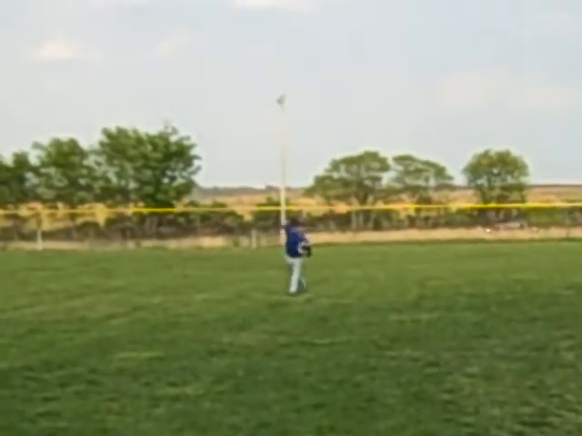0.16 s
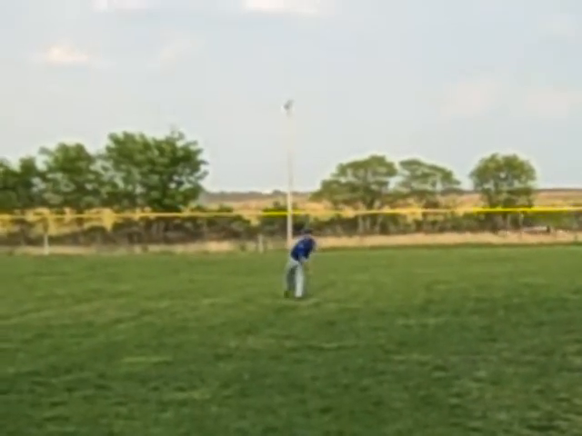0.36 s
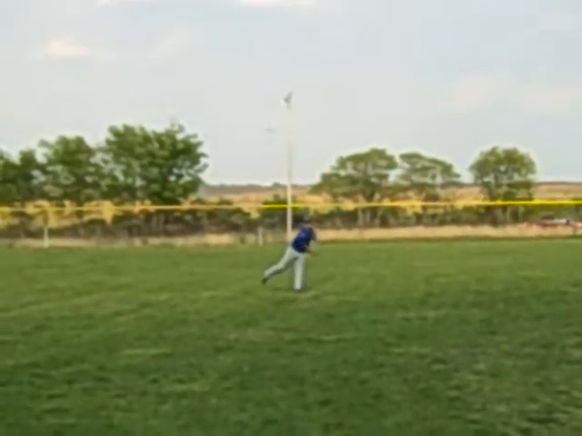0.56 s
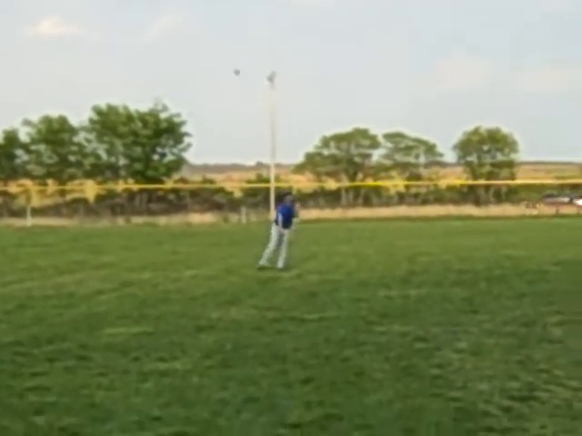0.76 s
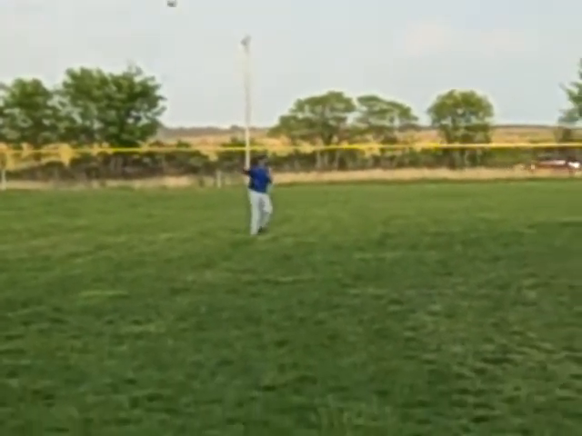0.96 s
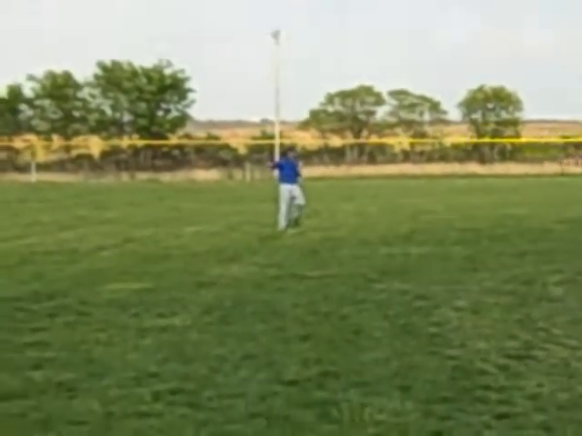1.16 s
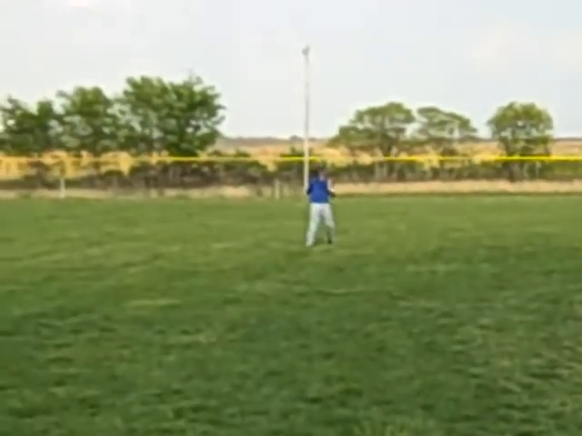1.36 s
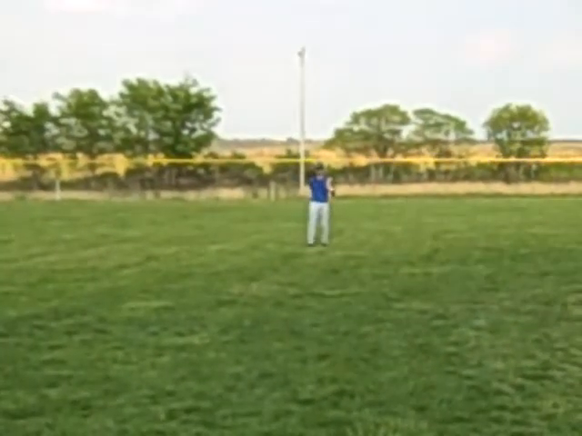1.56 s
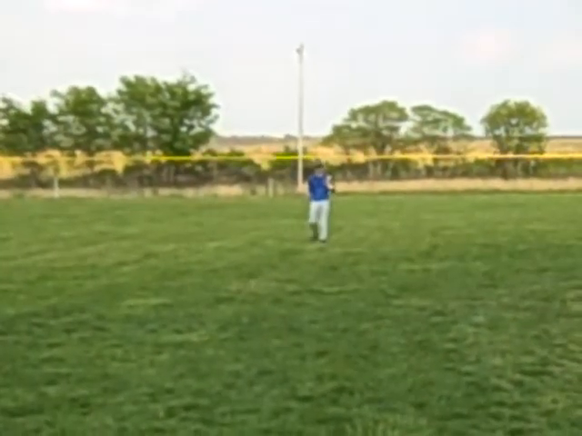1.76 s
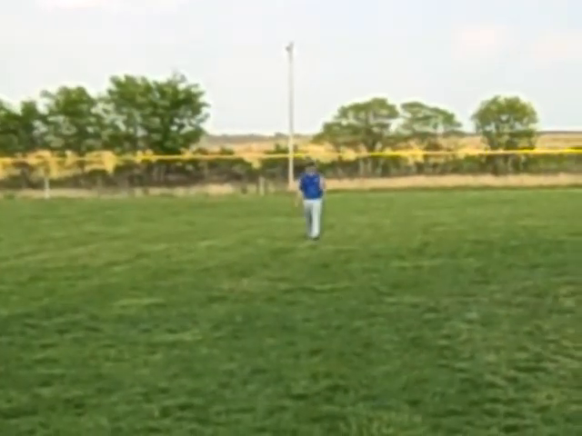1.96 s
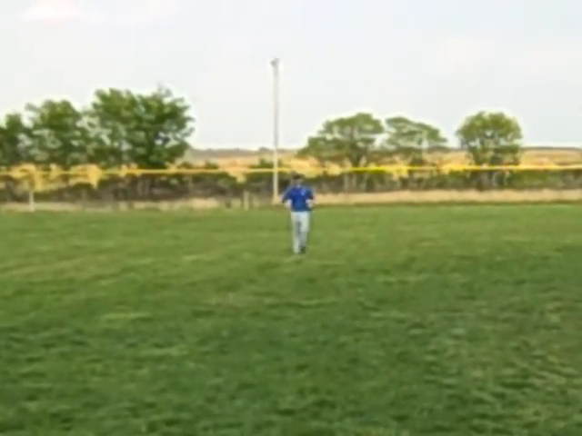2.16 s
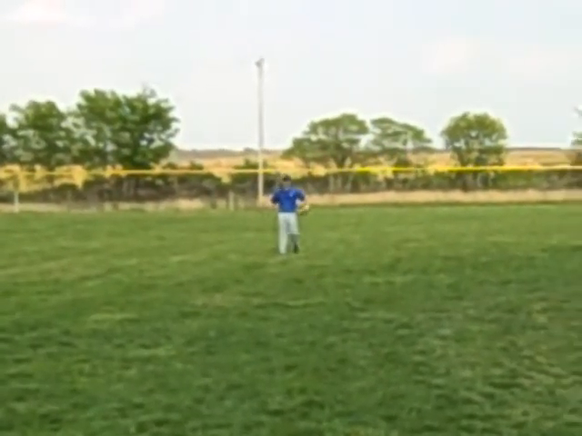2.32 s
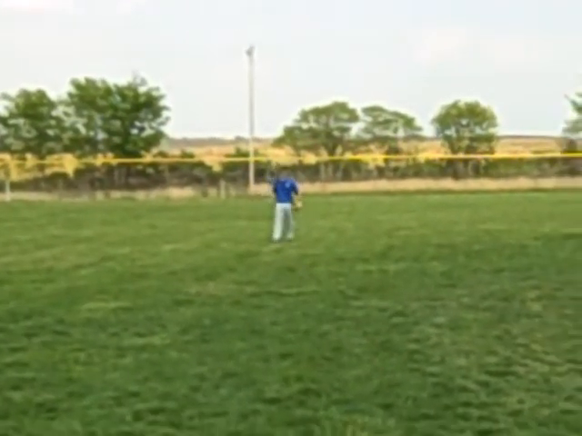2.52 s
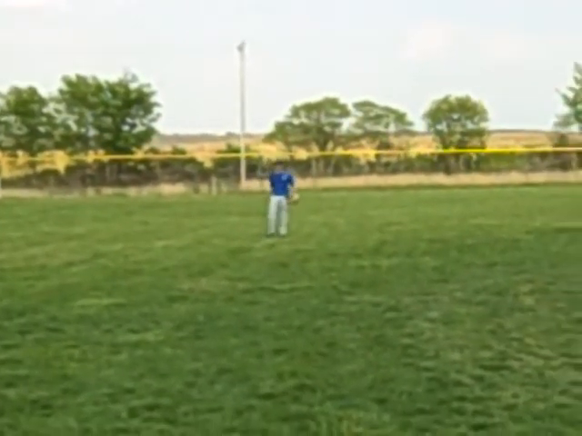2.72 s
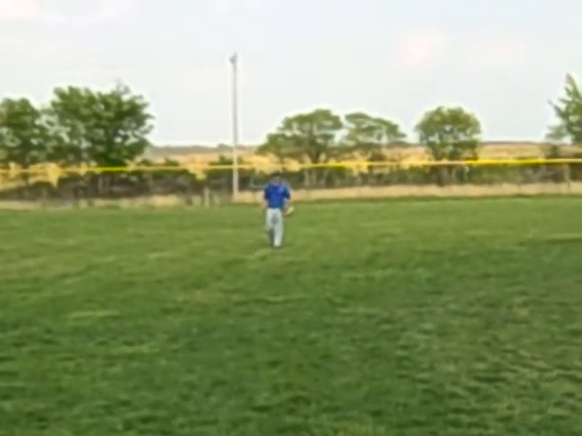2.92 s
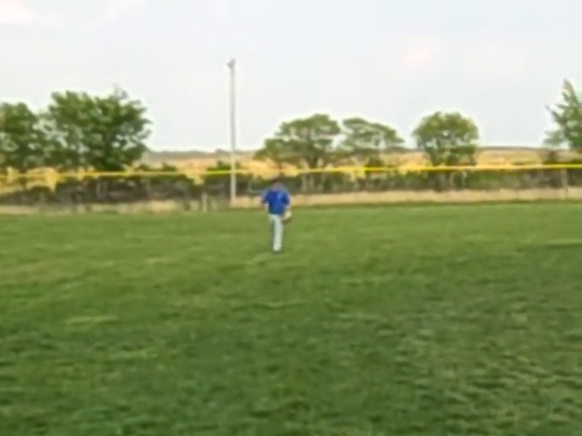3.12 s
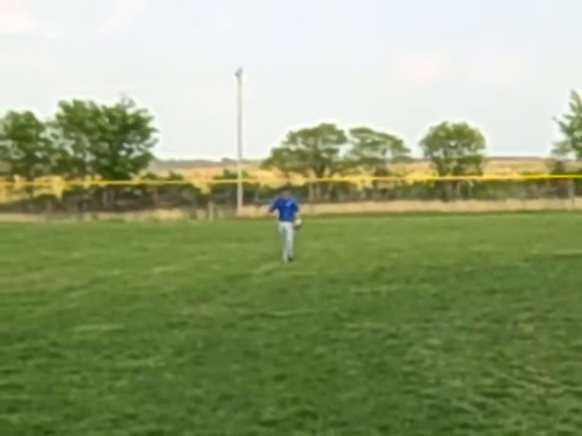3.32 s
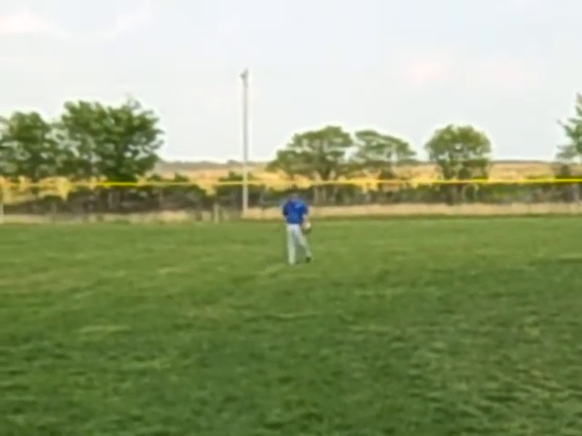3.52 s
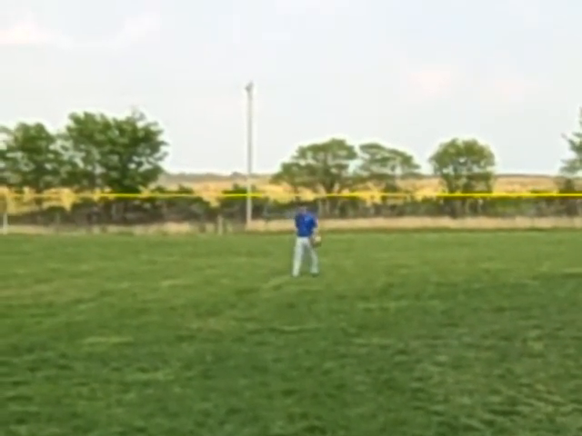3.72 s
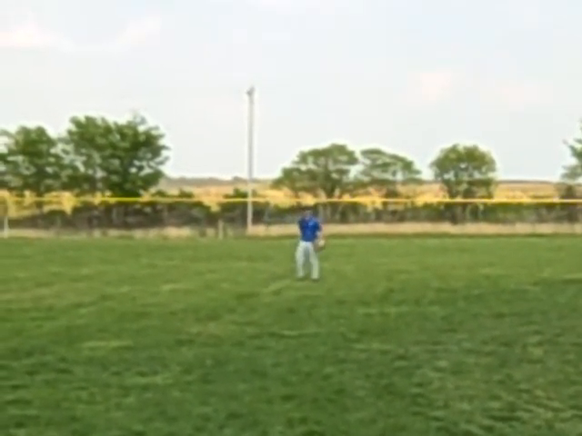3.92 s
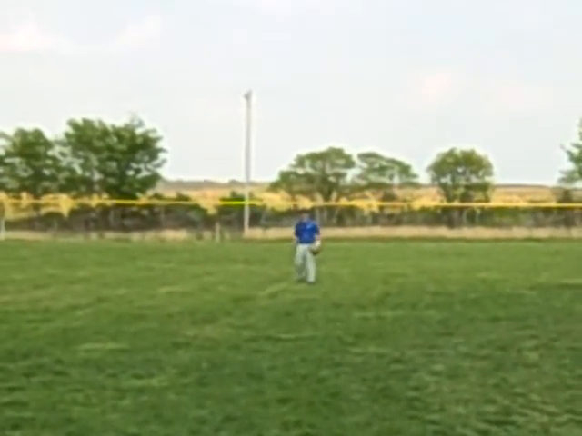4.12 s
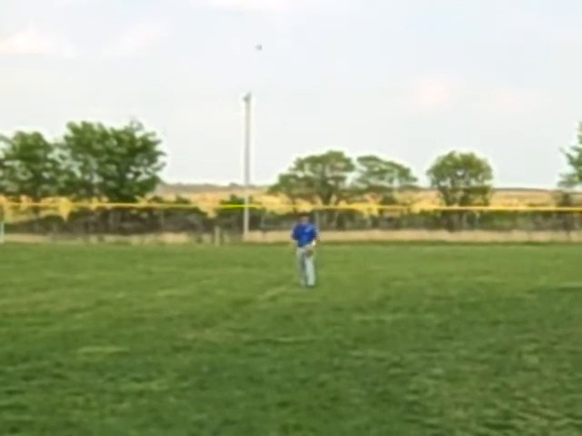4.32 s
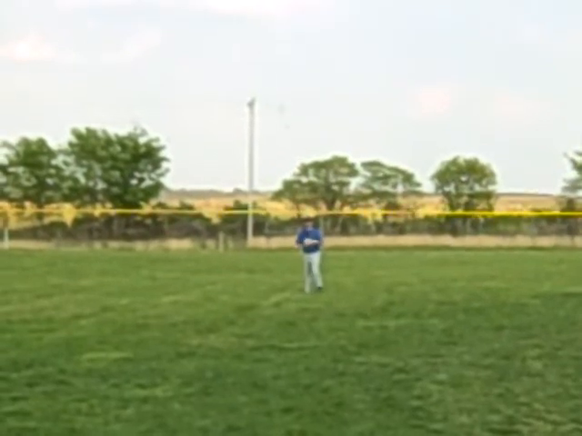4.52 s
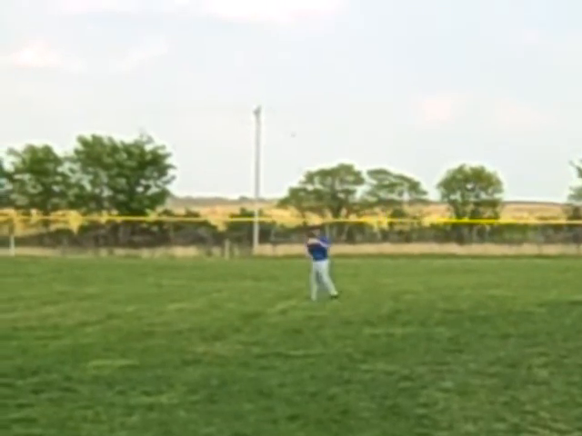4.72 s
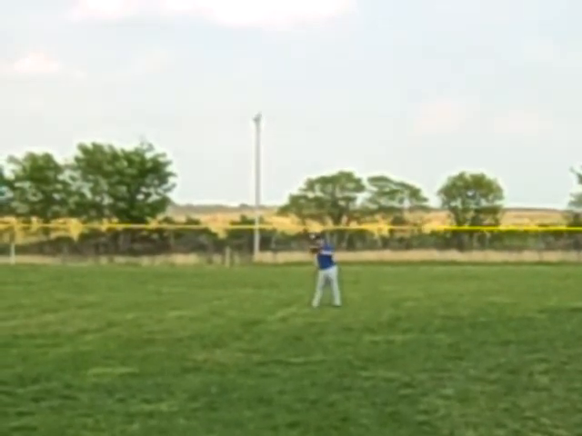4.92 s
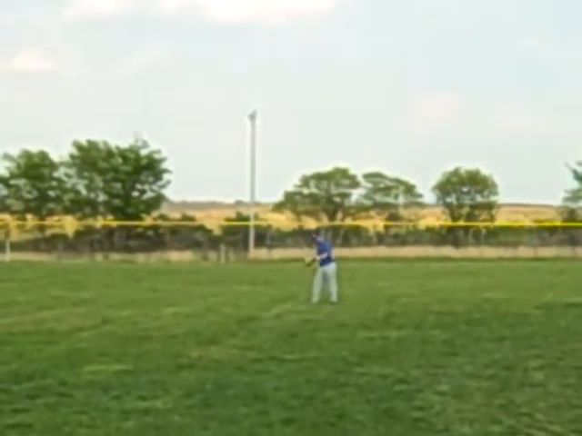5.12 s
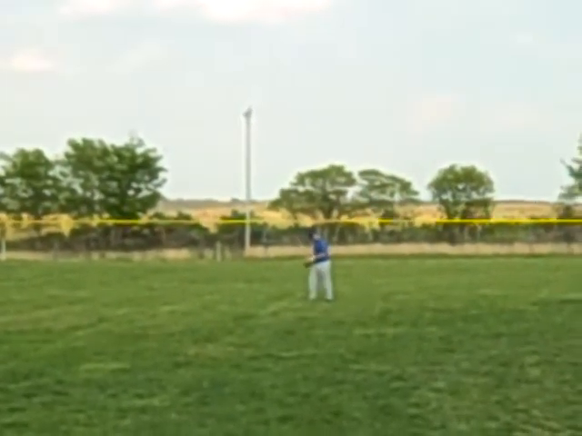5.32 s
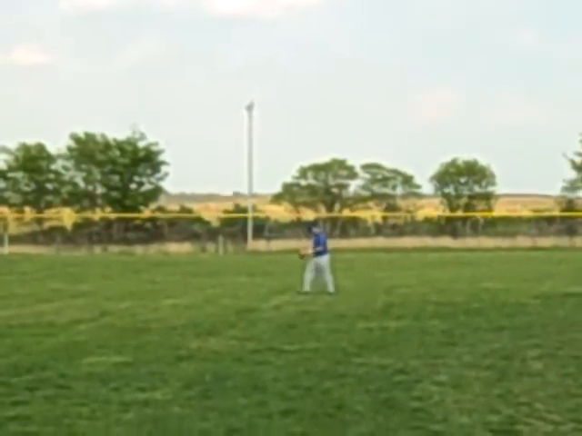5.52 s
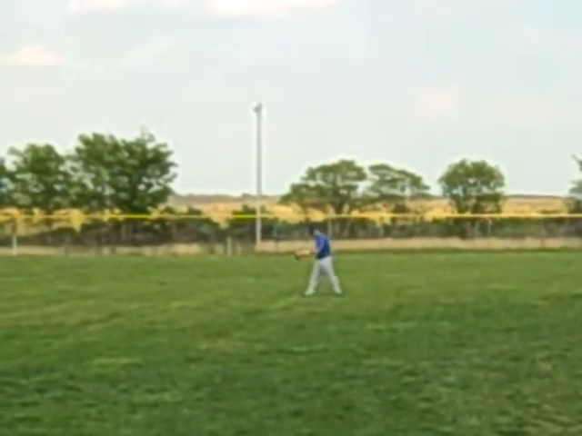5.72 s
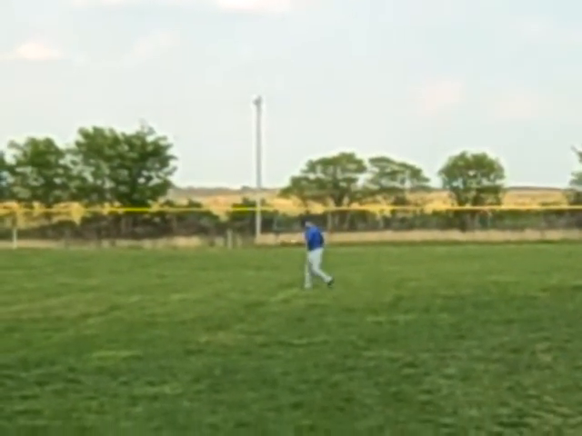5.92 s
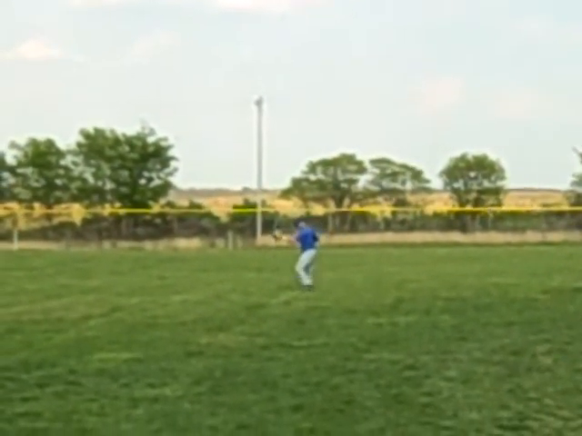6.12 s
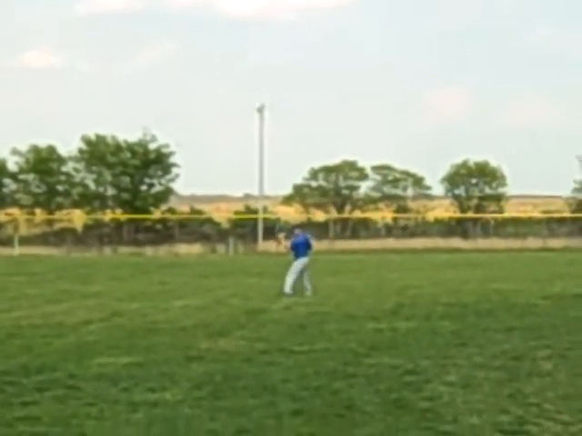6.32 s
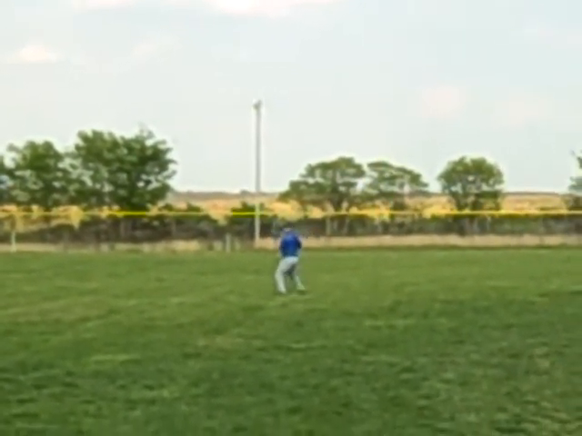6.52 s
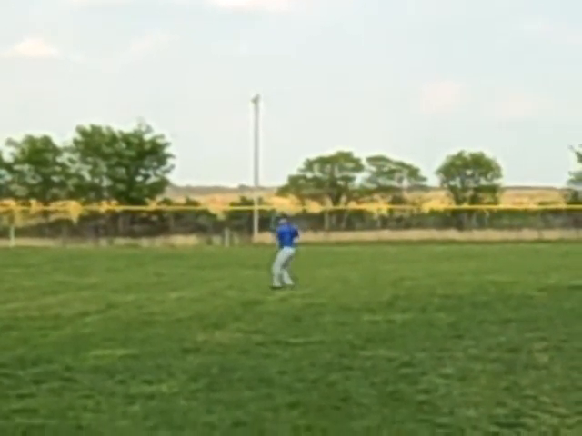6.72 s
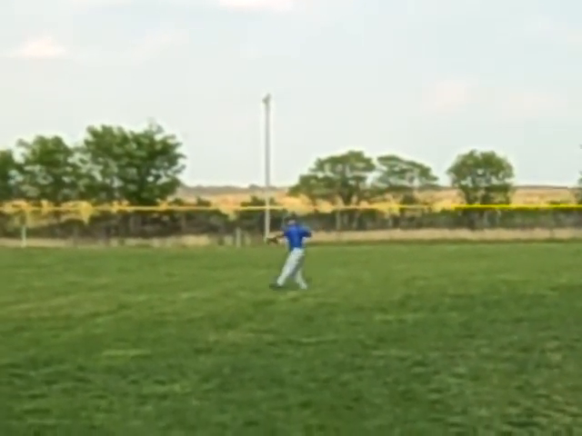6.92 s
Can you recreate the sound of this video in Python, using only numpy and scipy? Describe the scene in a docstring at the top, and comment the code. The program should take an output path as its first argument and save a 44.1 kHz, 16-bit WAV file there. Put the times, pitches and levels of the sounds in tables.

```python
"""Playing catch on a grass field

A ball smacks into a leather glove close by: a burst of crackle, ringing glove tones and a low puff of air.
The leather creaks as short bursts of coloured noise, and a sleeve rubs and swishes as noise that swells.
A fainter, duller pop comes from the far player's glove.
Songbirds whistle gliding pure tones, with a noisy echo, over a soft distant rush of filtered noise."""
import sys
import numpy as np
from scipy import signal
from scipy.fft import rfft, irfft, next_fast_len
from scipy.io import wavfile

SR = 44100
rng = np.random.default_rng(int(sys.argv[2]) if len(sys.argv) > 2 else 0)


def store_wav(level_fs):
    """Save 16-bit WAV to argv[1]."""
    pcm = np.round(np.clip(np.atleast_2d(level_fs), -1, 1) * 32767)
    wavfile.write(sys.argv[1], SR, pcm.T.astype(np.int16))


N = 311787
TIME = np.arange(N) / SR   # time of every sample, in seconds

# Levels in the tables are relative: a source may be trimmed as a whole later.
# Slow swells of the distant rush: (time [s], level [dB])
RUSH_SWELLS = [(0.0, -67.5), (0.61, -65.5), (0.92, -65), (1.4, -66), (1.73, -64), (2.09, -64),
               (2.34, -59.5), (2.56, -61.5), (4.09, -63.5), (4.51, -61.5), (4.75, -64), (7.07, -63.5)]
# Tone colour of the distant rush: (frequency [Hz], level [dB per Hz])
RUSH_COLOUR = [(100, -16), (200, -10), (400, -5), (800, 2.5), (1300, -2), (2200, -8.5), (4000, -21.5),
               (8000, -35.5)]
# Tone colour of the microphone's own noise: (frequency [Hz], level [dB per Hz])
MIC_NOISE_COLOUR = [(20, 6), (50, -9), (85, -7.5), (130, -11), (250, -10), (1000, -18), (4000, -23.5),
                    (15500, -31)]

# Sleeve rubbing with slow arm movements: (time [s], rise [s], hold [s], level [dB])
SLEEVE_RUBS = [(0.69, 0.13, 0.61, -67.5), (1.383, 0.26, 0.014, -58.5), (2.467, 0.14, 0.044, -57),
               (2.694, 0.24, 0.41, -66), (3.395, 0.054, 0.39, -64.5), (4.134, 0.052, 0.58, -67),
               (4.78, 0.18, 0.049, -64), (5.199, 0.18, 0.43, -68), (6.35, 0.42, .12, -65)]
# Tone colour of the rubbing cloth: (frequency [Hz], level [dB per Hz])
RUSTLE_COLOUR = [(700, -20.5), (1400, -7), (2300, -3), (3600, -3.5), (5500, -8), (7200, -11), (8300, -9.5),
                 (10500, -15), (12300, -13.5), (15800, -18)]
# Quick swishes of arm and sleeve: (peak time [s], level [dB], rise [s], fall [s])
SWISHES = [(3.687, -44, 0.0092, 0.0051), (3.698, -45.5, 0.0056, 0.0064), (3.72, -58.5, 0.11, 0.088),
           (5.629, -57, 0.031, 0.031), (6.79, -56, 0.021, 0.021)]
# Tone colour of the swishes: (frequency [Hz], level [dB per Hz])
SWISH_COLOUR = [(70, -20), (200, 2), (350, 2), (600, 1), (1100, 0.5), (2000, -1), (3500, -2.5),
                (6000, -10.5), (11000, -13), (15500, -10.5)]
RUB_RELEASE_S, RUB_REST_DB = 0.079, -76.5   # dying away, and lying still

# Rising bird slurs: (time [s], length [s], level [dB], top pitch [Hz], bend [power])
RISING_SLURS = [(1.591, 0.072, -65, 2500, 0.9), (2.553, .07, -65, 2690, 1.06),
                (2.728, 0.073, -64, 2710, 1.8), (3.145, 0.14, -67.5, 3350, 1.2),
                (3.749, 0.054, -64.5, 3790, 1.2), (3.904, 0.058, -65, 3820, 1),
                (4.371, .058, -66, 3280, 1.3), (6.16, 0.058, -70, 2750, 0.97),
                (6.68, 0.14, -67, 3420, 1.15)]
# Falling bird slurs: (time [s], length [s], level [dB], top pitch [Hz], end pitch [Hz])
FALLING_SLURS = [(0.937, .05, -65, 2400, 2050), (1.008, .055, -62.5, 2730, 2470),
                 (1.425, .1, -66, 2800, 2090), (2.625, 0.059, -61, 2450, 2150),
                 (3.286, .065, -67, 2790, 2060), (4.422, 0.046, -59, 2390, 2040),
                 (4.489, 0.054, -62, 2900, 2500), (5.834, 0.088, -70.5, 2725, 2130),
                 (6.075, 0.073, -68, 2700, 2100), (6.808, .07, -68, 2860, 2004)]
# Bird notes with a steady glide: (time [s], length [s], level [dB], starting pitch [Hz], climb [Hz])
GLIDING_NOTES = [(2.006, .07, -59, 3030, 350), (2.082, .075, -60, 3130, 270), (2.205, .09, -59, 2170, 60),
                 (5.535, .1, -69, 2620, 30), (6.03, .058, -59, 3610, -110), (6.225, .075, -68, 2230, -70)]
# Wavy falling warbles that answer the two steepest slurs: (time [s], level [dB])
WARBLES = [(3.796, -57), (3.959, -55.5)]
WARBLE_S, WARBLE_FROM_HZ, WARBLE_TO_HZ = 0.078, 2730, 2300
WARBLE_SWING_HZ, WARBLE_TURNS = 190, 1.2
# A bend over 1 eases the end of a slur; slurs are louder the higher they are above LOW_HZ
LOW_HZ, FALLING_BEND, LOUDER_DB_PER_OCTAVE = 2080, 1.25, 12.5

# Creaks and taps of glove and ball in the hand:
# (time [s], starting level [dB], centre frequency [Hz], time to fall 60 dB [s])
CREAKS = [(1.536, -39, 1660, 0.014), (1.742, -31.5, 1340, 0.022), (1.859, -44, 2300, 0.024),
          (1.886, -35.5, 1272, 0.021), (1.971, -44, 3590, 0.028), (2.181, -35, 1030, 0.014),
          (2.242, -39.5, 2170, 0.024), (2.306, -42, 1280, 0.028), (2.871, -33, 2970, 0.0092),
          (2.895, -40.5, 1490, 0.014), (3.558, -36.5, 1340, 0.013), (3.565, -37, 1960, 0.012),
          (3.6, -38, 1840, 0.012), (3.632, -39.5, 1530, 0.015), (3.81, -39.5, 2480, 0.016),
          (6.435, -35.5, 853, 0.014)]
# Tone colour of the creaks: (frequency [Hz], level [dB per Hz])
CREAK_COLOUR = [(100, -18), (400, -1.5), (1000, 3), (3000, 1.5), (8000, -2.5), (15500, -13)]
# Spells when the leather is worked and ticks faintly: (start [s], end [s])
HANDLING_SPELLS = [(1.96, 2.0), (3.48, 3.54), (5.4, 5.42)]
TICKS_PER_S, TICK_DB, TICK_HZ, TICK_T60_S = 35, -47.5, 2940, 0.049   # middle level and pitch

# The ball meets the near glove, seats in the pocket, and the fingers clap shut:
# (time [s], push level [dB], contact brightness [Hz], crackle level [dB])
NEAR_CATCH = [(1.67267, -15, 7500, -21), (1.67371, 4, 300, -15), (1.67512, -2, 1000, -11),
              (1.67691, 5, 2000, -17), (1.68041, -6, 1800, -19), (1.68162, -11, 1700, -24),
              (1.68241, -18, 1300, -32), (1.69038, -24, 9000, -30)]
# Ringing tones of the near glove: (frequency [Hz], level [dB], time to fall 60 dB [s])
NEAR_GLOVE = [(262, -17.8, 0.012), (421, -16.0, 0.025), (625, -16.3, 0.026), (791, -10.5, 0.036),
              (974, -14.7, 0.031), (1201, -18.9, 0.03), (1369, -9.3, 0.022), (1544, -13.7, 0.019),
              (1761, -16.3, 0.023), (2055, -8.3, 0.016), (2309, -10.5, 0.018), (2441, -14.6, 0.024),
              (2944, -16.5, 0.039), (3255, -15.9, 0.02), (3627, -11.0, 0.026), (4643, -14.3, 0.013),
              (5270, -15.1, 0.013)]
# Contacts of the far catch: (time [s], push level [dB], contact brightness [Hz], crackle level [dB])
FAR_CATCH = [(5.27857, -26, 3900, -32), (5.28007, -20, 2000, -38), (5.28193, -7.7, 1500, -38),
             (5.2839, -24, 2700, -40), (5.28562, -25.6, 2700, -50), (5.29149, -36, 4800, -54)]
# Ringing tones of the far glove: (frequency [Hz], level [dB], time to fall 60 dB [s])
FAR_GLOVE = [(302, -25, 0.012), (840, -20.5, 0.019), (1567, -7.5, 0.0098), (1880, -8.5, 0.015),
             (2304, -3.5, .01), (2920, -20, 0.034), (3000, -24, 0.033), (5200, -18.5, 0.0069)]
# Tone colour of slapped leather: (frequency [Hz], level [dB per Hz])
LEATHER_COLOUR = [(100, -15.5), (400, -4.5), (1000, -1.5), (2500, 1), (4000, -5), (6000, -7),
                  (10000, -14.5), (15500, -19.5)]
CUTOFF_HZ = 15800   # top of the finished sound


def from_db(db):
    """Turn decibels into a plain multiplier."""
    return 10 ** (np.asarray(db) / 20)


def rms_one(x):
    """Scale a sound so its average strength (rms) is 1."""
    return x / np.sqrt(np.mean(x ** 2) + 1e-20)


def level(rows):
    """Join (time, dB) points into a gain for every sample."""
    return from_db(np.interp(TIME, *np.transpose(rows)))


def butter(x, hz, kind, order=2):
    """Take off the highs ("low" pass) or the lows ("high" pass)."""
    safe_hz = np.clip(hz, 10, 0.45 * SR)
    return signal.sosfilt(signal.butter(order, safe_hz, kind, fs=SR, output="sos"), x + 1e-18)


def noise(colour):
    """Shape random hiss to a smooth tone colour, with rms 1."""
    hz, db = np.transpose(colour)
    size = next_fast_len(N)
    bins = np.maximum(np.fft.rfftfreq(size, 1 / SR), 1)
    gain = from_db(np.interp(np.log(bins), np.log(hz), db))
    spectrum = gain * rfft(rng.standard_normal(size))
    return rms_one(irfft(spectrum)[:N])


def flutter(per_s, depth_db):
    """Make a gain that wanders between random points, per_s of them each second."""
    steps = rng.standard_normal(N // 8)
    return from_db(depth_db * np.interp(TIME * per_s, np.arange(len(steps)), steps))


def decay(start, t60):
    """Jump to 1 at the start, then die away by 60 dB in t60 seconds."""
    age = TIME - start
    return (age >= 0) * from_db(-60 * np.clip(age / t60, 0, 10))


def background():
    """The far rush of open country swells gently over the microphone's own steady noise."""
    rush = from_db(1.5) * level(RUSH_SWELLS) * flutter(12, 0.75) * noise(RUSH_COLOUR)
    return rush + from_db(-64.5) * noise(MIC_NOISE_COLOUR)


def sleeve():
    """Cloth rubs with every slow movement and swishes when the arm moves fast."""
    moving = np.zeros(N)
    for s, rise, hold, db in SLEEVE_RUBS:
        swell = np.clip((TIME - s) / rise, 0, 1)
        release = np.exp(-np.clip((TIME - s - rise - hold) / RUB_RELEASE_S, 0, 20))
        moving += from_db(db) * swell * release
    speed = np.zeros(N)
    for s, db, rise, fall in SWISHES:
        distance = np.maximum((s - TIME) / rise, (TIME - s) / fall)   # from the peak, before or after
        speed += from_db(db) * np.exp(-np.minimum(distance, 20))
    rubbing = np.hypot(moving, from_db(RUB_REST_DB)) * flutter(210, 1.0) * noise(RUSTLE_COLOUR)
    swishing = speed * flutter(400, 4.1) * noise(SWISH_COLOUR)
    return rubbing + swishing


def along(length):
    """Count from 0 to 1 over a note of this many seconds."""
    return np.linspace(0, 1, round(length * SR))


def notes():
    """List bird notes as (time, dB, pitch at each sample); slurs are louder towards their top."""
    slurs = []
    for s, length, db, top, bend in RISING_SLURS:
        slurs.append((s, db, top + (LOW_HZ - top) * (1 - along(length)) ** bend))
    for s, length, db, top, end in FALLING_SLURS:
        slurs.append((s, db, end + (top - end) * (1 - along(length)) ** FALLING_BEND))
    rows = [(s, db + LOUDER_DB_PER_OCTAVE * np.log2(hz / LOW_HZ), hz) for s, db, hz in slurs]
    for s, length, db, hz, climb in GLIDING_NOTES:
        rows.append((s, db, hz + climb * along(length)))
    u = along(WARBLE_S)
    fall = WARBLE_FROM_HZ + (WARBLE_TO_HZ - WARBLE_FROM_HZ) * u
    warble = fall - WARBLE_SWING_HZ * np.sin(2 * np.pi * WARBLE_TURNS * u)
    return rows + [(s, db, warble) for s, db in WARBLES]


def birds(waver, echo_db, echo_t60):
    """Pure whistles glide in pitch, and trees scatter them into a fading echo."""
    song, unsteady = np.zeros(N), flutter(130, 0.98)
    for s, db, hz in notes():
        start = round(s * SR)
        span = slice(start, start + len(hz))
        arch = np.sqrt(2 * np.abs(np.sin(np.linspace(0, np.pi, len(hz)))))   # fades in and out
        phase = 2 * np.pi * np.cumsum(hz * unsteady[span] ** waver) / SR
        song[span] += from_db(db) * arch * np.sin(phase)
    trees = rng.standard_normal(SR) * from_db(-60 * TIME[:SR] / echo_t60)
    echo = signal.fftconvolve(song, trees / np.linalg.norm(trees))[:N]
    return from_db(-2.5) * song * unsteady + from_db(echo_db) * echo


def flight(db, rise, top_hz):
    """The air round the incoming ball rushes louder until the glove stops it."""
    to_go = NEAR_CATCH[0][0] - TIME
    nearness = (to_go > 0) / (1 + np.abs(to_go) / rise)   # half strength at rise seconds to go
    rush = rms_one(butter(noise(LEATHER_COLOUR), top_hz, "low"))
    return from_db(db) * nearness * (to_go < 0.3) * rush


def ticks():
    """Worked leather slips faintly at uneven moments; rows are laid out like the creaks."""
    rows = []
    for start, end in HANDLING_SPELLS:
        count = max(1, round(TICKS_PER_S * (end - start)))
        for k, (when, size, pitch) in enumerate(rng.random((count, 3))):
            s = start + (end - start) * (k + when) / count
            db = TICK_DB + 6 * (size - 0.5)
            hz = TICK_HZ * 2 ** (pitch - 0.5)   # up to half an octave either way
            rows.append((s, db, hz, TICK_T60_S))
    return rows


def creaks(width, broad_db):
    """Leather slips briefly: fading noise through one broad resonance, plus some plain noise."""
    out, grain, size = np.zeros(N), noise(CREAK_COLOUR), SR // 10
    for s, db, hz, t60 in list(CREAKS) + ticks():
        i = round(s * SR)
        fade = from_db(-60 * TIME[:size] / t60)
        slip = grain[i:i + size] * fade
        r = np.exp(-np.pi * width * hz / SR)   # width is a share of the centre frequency
        tone = signal.lfilter([1, 0, -1], [1, -2 * r * np.cos(2 * np.pi * hz / SR), r * r], slip)
        mix = rms_one(rms_one(tone) + from_db(broad_db) * rms_one(slip))
        out[i:i + size] += from_db(db) * np.std(fade) * mix   # the level is that of the first instant
    return out


def ring(force, hz, t60):
    """A push sets one tone of the glove swinging; a unit click starts it at height 1."""
    r, w = from_db(-60 / (t60 * SR)), 2 * np.pi * hz / SR
    return signal.lfilter([0.5, 0, -0.5], [1, -2 * r * np.cos(w), r * r], force + 1e-18)


def smear(x, hz, order):
    """Slack leather passes low notes on later than high ones: a chain of all-pass filters."""
    a = np.exp(-2 * np.pi * hz / SR)
    return signal.sosfilt([[-a, 1, 0, 1, -a, 0]] * order, x + 1e-18)


def catch(contacts, modes, body_db, crack_db, crackle_t60, settle_db, settle_t60):
    """Each contact makes the glove ring and the leather crackle; then the glove settles."""
    force, crackle = np.zeros(N), np.zeros(N)
    for s, db, bright_hz, crackle_db in contacts:
        push = np.zeros(N)
        push[round(s * SR)] = from_db(db)
        force += butter(push, bright_hz, "low", order=1)   # a padded contact is a duller one
        crackle += from_db(crackle_db) * decay(s, crackle_t60)
    ringing = sum(from_db(db) * ring(force, hz, t60) for hz, db, t60 in modes)
    body = smear(ringing, hz=1430, order=4)
    settling = from_db(settle_db) * decay(contacts[2][0], settle_t60) * flutter(700, 1.1)
    leather = (from_db(crack_db) * crackle + settling) * noise(LEATHER_COLOUR)
    return from_db(body_db) * body + leather


def thump(db, t60, after_db, after_t60, top_hz):
    """Air squeezed from the pocket presses on the microphone, which swings back and recovers slowly."""
    s = NEAR_CATCH[1][0]
    press = from_db(db) * decay(s, t60)
    swing_back = from_db(after_db) * decay(s, after_t60)
    return butter(press - swing_back, top_hz, "low")


def scene():
    """Add up both catches, the flying ball, the handling, the birds and the field."""
    near = catch(NEAR_CATCH, NEAR_GLOVE, body_db=1.0, crack_db=-5.5, crackle_t60=0.010,
                 settle_db=-23.0, settle_t60=0.084)
    near = butter(near, 170, "high")   # little of the near catch lies below 170 Hz
    far = catch(FAR_CATCH, FAR_GLOVE, body_db=0.3, crack_db=-6, crackle_t60=0.0086,
                settle_db=-56, settle_t60=0.1)
    far = butter(far, 13000, "low")   # air and grass take off the top and bottom
    far = butter(far, 420, "high", order=1)
    whoosh = flight(db=-49.0, rise=0.0064, top_hz=450)
    puff = thump(db=-12.5, t60=0.017, after_db=-48.5, after_t60=1.1, top_hz=75)
    handling = from_db(-5.5) * creaks(width=0.45, broad_db=-9.0) + sleeve()
    song = birds(waver=0.04, echo_db=-7, echo_t60=0.39)
    return (near + far + whoosh + puff + handling + song + background())[None]


def record(dry):
    """Squash the loudest peaks smoothly, then cut the very top."""
    rounded = dry / (1 + dry ** 4) ** 0.25
    top_cut = signal.ellip(12, 0.1, 90, CUTOFF_HZ, fs=SR, output="sos")   # ripple and stop depth in dB
    return signal.sosfilt(top_cut, rounded)


dry = scene()
out = record(dry)
store_wav(out)
```